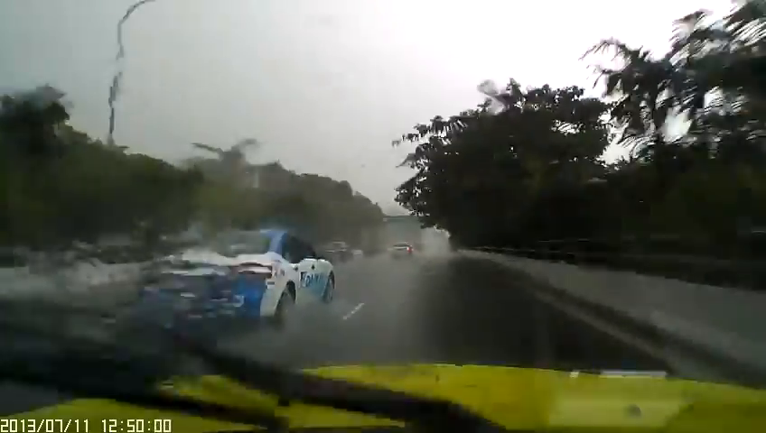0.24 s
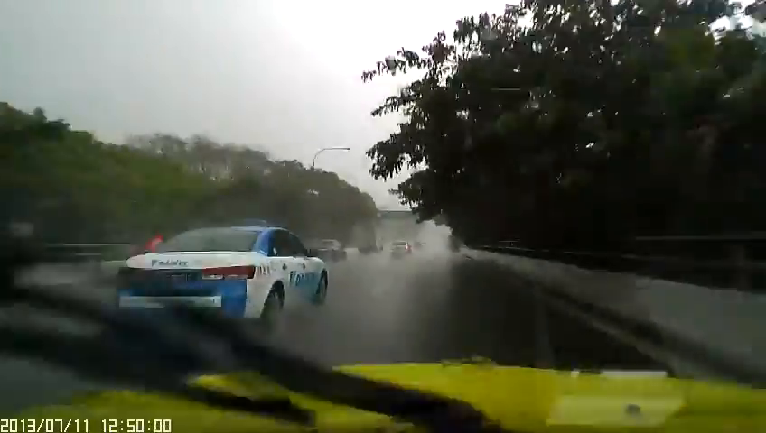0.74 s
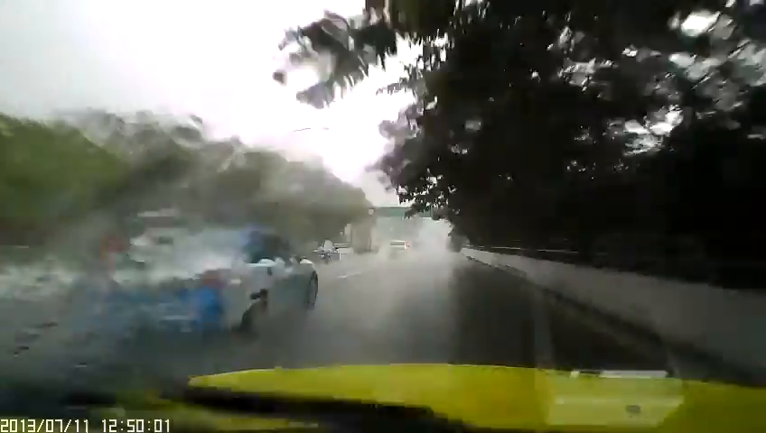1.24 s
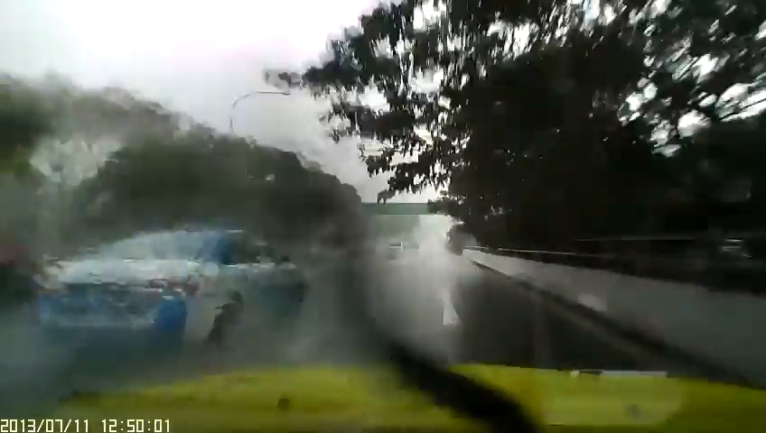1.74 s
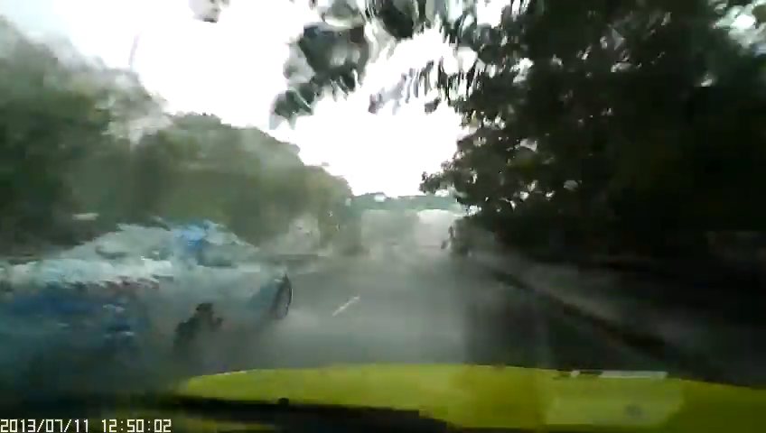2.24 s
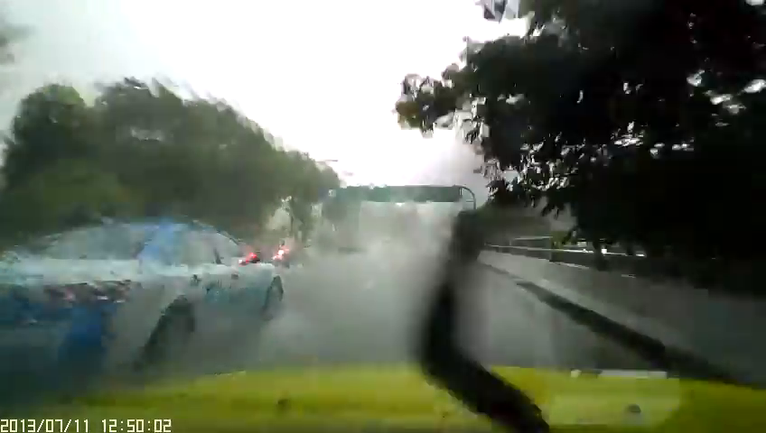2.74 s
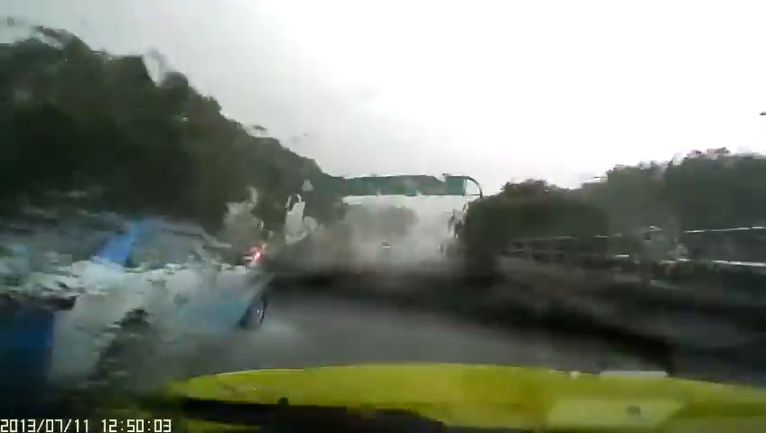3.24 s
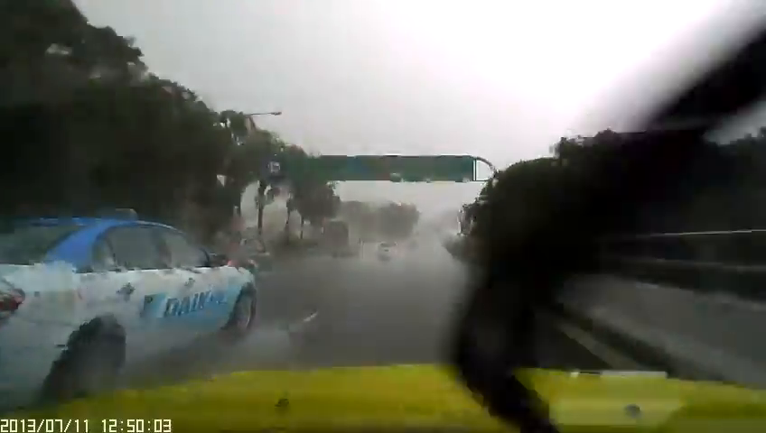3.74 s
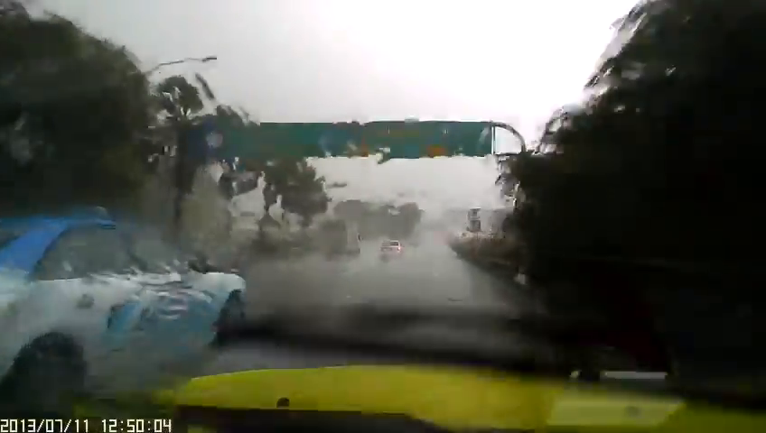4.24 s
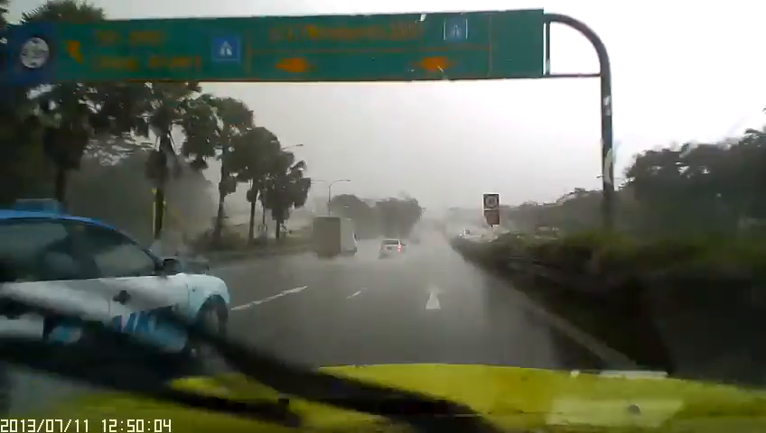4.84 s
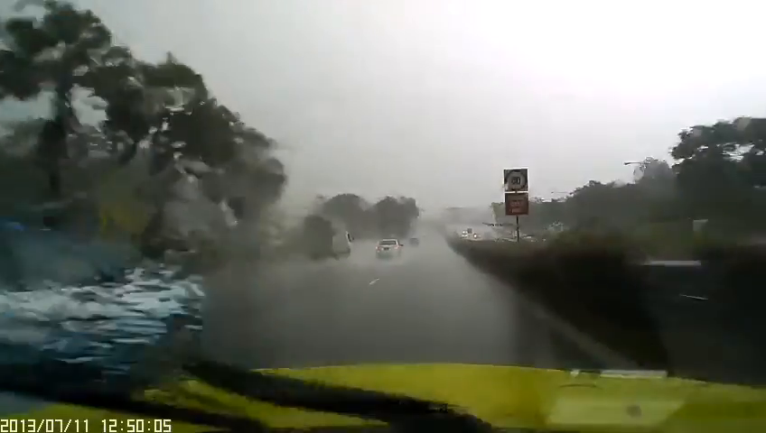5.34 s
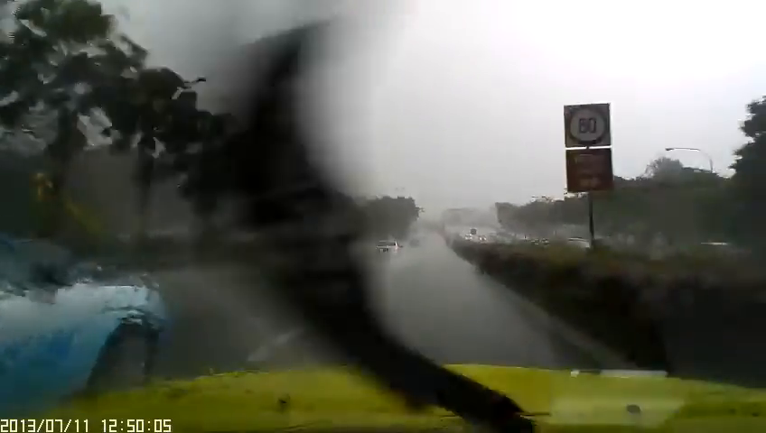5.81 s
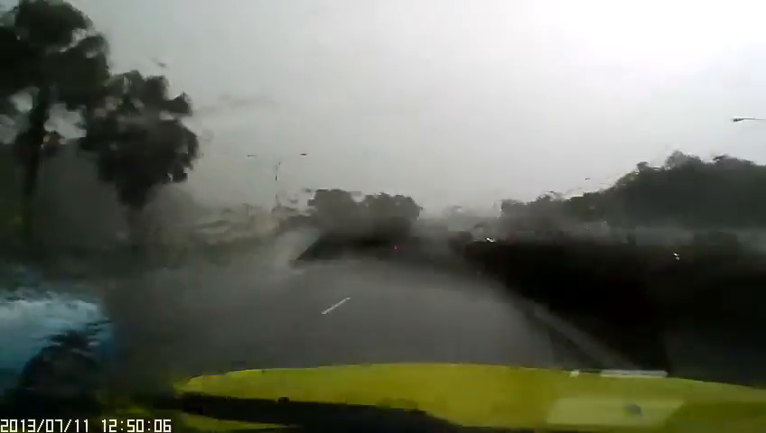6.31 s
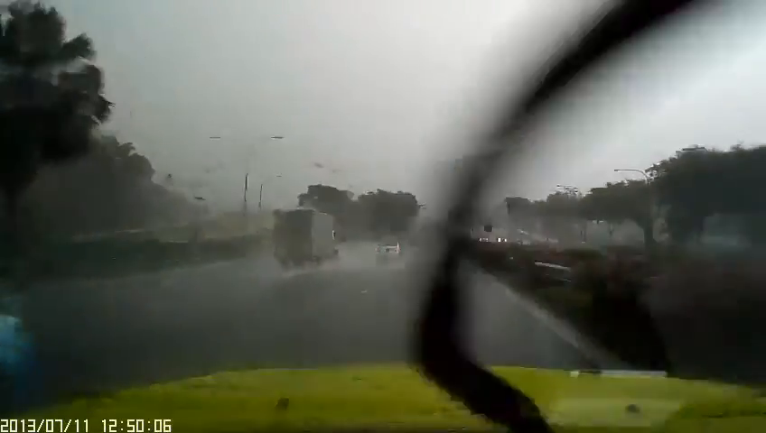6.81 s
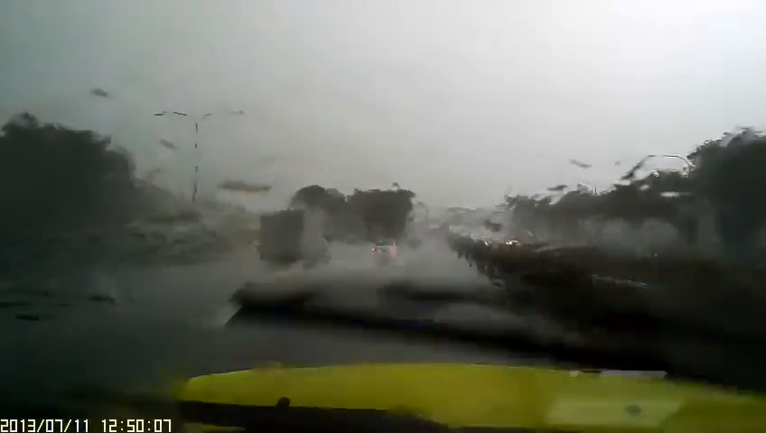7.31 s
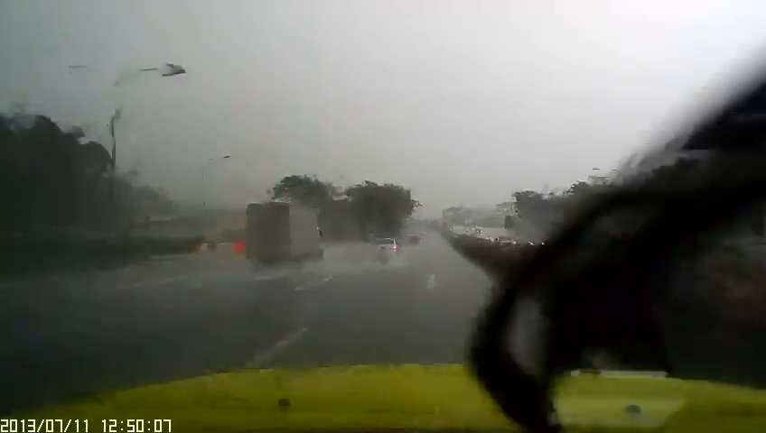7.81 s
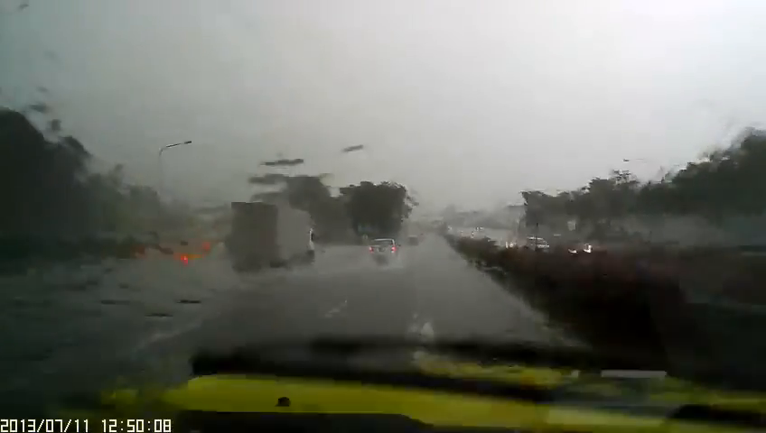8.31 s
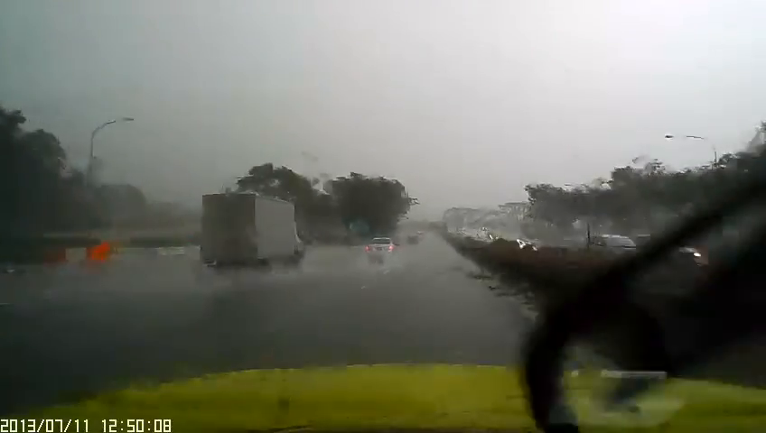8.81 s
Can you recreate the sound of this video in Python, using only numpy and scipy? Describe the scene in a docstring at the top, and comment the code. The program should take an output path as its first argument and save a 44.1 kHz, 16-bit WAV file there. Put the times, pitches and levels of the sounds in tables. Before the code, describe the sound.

Heavy rain drums on the windscreen and roof inside a moving car, with wipers thumping each second over deep road rumble and engine drone.

```python
"""Rain drums on the windscreen and roof of a car on a motorway: many small random blows, coloured by each panel.
Sheets of water make it swell, fat drops crack and splash, and an overhead sign gives a short lull.
The engine drones, eases off and picks up again as three sine overtones; the road rumbles as filtered noise with
some large deep swings. The wipers thump about once a second with ringing tones, a judder and a rub of noise.
Faint hiss follows the deep swings, and short noise ticks fall where a large swing crosses a level."""
import sys
import numpy as np
from scipy import signal
from scipy.fft import rfft, irfft, next_fast_len
from scipy.io import wavfile
from scipy.ndimage import uniform_filter1d

SR = 44100
rng = np.random.default_rng(int(sys.argv[2]) if len(sys.argv) > 2 else 0)


def file_out(sig):
    """Save sig as 16-bit WAV at sys.argv[1]."""
    # one column per channel
    cols = np.atleast_2d(sig).T
    # limit, then scale
    lim = np.clip(cols, -1, 1)
    pcm = np.round(lim * 32767).astype(np.int16)
    wavfile.write(sys.argv[1], SR, pcm)


N = 399546

# rain on glass and roof: level before the panel filter or at the roof [dB], change per dB of rain [dB]
GLASS_DB, GLASS_FOLLOWS = -29.5, 0.9
ROOF_DB, ROOF_FOLLOWS = -34, 1.19
# small chance swings of the rain, and of the roof alone [dB], and their speed [per s]
FLURRY_DB, ROOF_FLURRY_DB, FLURRIES_PER_S = 0.68, 1.1, 12
# shelter under an overhead sign: peak time [s], length [s], drop in rain [dB]
GANTRY_S, GANTRY_LENGTH_S, GANTRY_SHELTER_DB = 5.165, 0.2, 7.5
OCTAVE_DB, THIRD_DB = -14.5, -29   # engine overtones, before the cabin boom
SWING_HZ, SWING_LENGTH_S = 33, 0.099   # the large swings of the rumble
JUDDER_HZ, JUDDER_T60_S = 277, 0.027   # typical pitch, and time to grow or fade by 60 dB
RUB_RISE_S = 0.05   # time for the rub to grow by 60 dB
# a stretch of coarser asphalt: peak time [s], length [s]; pitch [Hz], filter width [Hz], level [dB]
COARSE_S, COARSE_LENGTH_S = 4.2, 4.0
COARSE_HZ, COARSE_WIDTH_HZ, COARSE_DB = 88, 70, -35
CUTOFF_HZ = 15600   # the treble above this is cut


def from_db(db):
    """Turn decibels into a plain factor for the sound wave."""
    return 10 ** (np.asarray(db) / 20)


def rms_one(x):
    """Scale to an average strength (rms) of 1."""
    return x / np.sqrt(np.mean(x ** 2) + 1e-20)


def in_time(rows):
    """Join the points of each column with straight lines, one value per sample."""
    s, *columns = np.transpose(rows)
    return [np.interp(np.arange(N) / SR, s, c) for c in columns]


def drift(rate):
    """Smooth chance wandering of rms 1 that changes about rate times a second."""
    hz = np.arange(N // 2 + 1) * SR / N
    slowed = rfft(rng.standard_normal(N)) / (1 + (hz / rate) ** 2)
    return rms_one(irfft(slowed, N))


def swell(s, length_s):
    """A smooth rise and fall between 0 and 1 that peaks at time s."""
    return np.cos(np.pi * np.clip((np.arange(N) / SR - s) / length_s, -.5, .5)) ** 2


def colour(x, spectrum):
    """Filter with the given spectrum that reacts only after a sound arrives, as early as it can (minimum phase)."""
    size = next_fast_len(N + SR // 2, real=True) // 2 * 2
    hz, db = np.transpose(spectrum)
    bins = np.maximum(np.arange(size // 2 + 1) * SR / size, 1)
    gain_db = np.interp(np.log(bins), np.log(hz), db)
    # folding the cepstrum forward in time gives the minimum-phase filter
    cepstrum = irfft(np.log(from_db(gain_db)))
    cepstrum[1:size // 2] *= 2
    cepstrum[size // 2 + 1:] = 0
    return irfft(rfft(x, size) * np.exp(rfft(cepstrum)))[:N]


def resonance(x, hz, width):
    """Let one pitch ring: a two-pole band-pass with gain close to 1 at its centre."""
    r = np.exp(-np.pi * width / SR)
    feed = np.array([1, 0, -1]) * (1 - r * r) / 2
    feedback = [1, -2 * r * np.cos(2 * np.pi * hz / SR), r * r]
    return signal.lfilter(feed, feedback, x + 1e-18)


def edge(x, hz, kind):
    """Keep only what lies below or above hz (second-order low- or high-pass)."""
    return signal.sosfilt(signal.butter(2, hz, kind, fs=SR, output="sos"), x)


def add(track, s, sound):
    """Mix a sound in at time s."""
    start = max(round(s * SR), 0)
    track[start:start + len(sound)] += sound[:N - start]


def impact(t60, cabin_db, cabin_t60):
    """One blow on a panel: noise that dies fast, then the short tail of the cabin; energy 1."""
    t = np.arange(SR // 10) / SR
    panel_fade = from_db(-60 * t / t60)
    cabin_fade = from_db(cabin_db - 60 * t / cabin_t60)
    ring = rng.standard_normal(len(t)) * (panel_fade + cabin_fade)
    return ring / np.linalg.norm(ring)


def patter(per_s, size_db, clump_db, t60, cabin_db, cabin_t60, count=16):
    """Drops of random size land in clumps on many spots of a panel, each spot with a ring of its own."""
    born = rng.random(N) < per_s / SR
    chance_size = np.minimum(rng.exponential(1, N), 4)
    sizes = from_db(size_db * chance_size + clump_db * drift(18.0))
    spot = rng.integers(0, count, N)
    drops = np.zeros(N)
    for k in range(count):
        drops += signal.oaconvolve(born * sizes * (spot == k), impact(t60, cabin_db, cabin_t60))[:N]
    # even out the strength over quarter seconds
    return drops / np.sqrt(uniform_filter1d(drops ** 2, size=SR // 4) + 1e-12)


def rain_strength():
    """The steady rain in dB, raised by each sheet of water and lowered under the overhead sign."""
    # how hard the steady rain beats on the car: (time [s], level [dB])
    steady_rain = [(0.0, -2), (0.8, 0.3), (1.15, 1.4), (2.15, 0.23), (2.55, -2.5), (3.95, -3.0), (4.2, 1.5),
                   (4.8, 1.1), (5.4, -6.5), (5.85, -5.5), (6.2, -0.8), (7.3, -3.5), (8.3, -1.0),
                   (9.06, 0.5)]
    # sheets of water that sweep over the car: (time of the peak [s], length [s], swell [dB])
    water_sheets = [(0.01, 0.54, 3), (0.363, 0.04, 2.5), (0.985, 0.38, 3), (1.417, 0.28, 3),
                    (1.612, 0.02, 7.5), (1.948, 0.45, 5.5), (2.323, 0.13, 4.5), (2.71, 0.13, 3.5),
                    (3.159, 0.15, 5.5), (3.616, 0.33, 5), (3.82, 0.29, 2), (4.105, 0.2, 4),
                    (4.352, 0.19, 2), (4.852, 0.12, 3), (5.078, 0.0871, 0.5), (5.28, 0.88, 2),
                    (5.51, 0.15, 5.5), (5.714, 0.42, 4.5), (6.01, 0.37, 4.5), (6.298, 0.092, 5),
                    (6.516, 0.39, 2.5), (6.888, 0.5, 5), (7.166, 0.12, 6), (7.46, 0.27, 3),
                    (7.968, 0.28, 3.5), (8.389, 0.33, 3), (8.571, 0.14, 4), (8.855, 0.24, 4.5)]
    steady_db, = in_time(steady_rain)
    sheets_db = sum(db * swell(s, length_s) for s, length_s, db in water_sheets)
    shelter_db = GANTRY_SHELTER_DB * swell(GANTRY_S, GANTRY_LENGTH_S)
    return steady_db + sheets_db - shelter_db + FLURRY_DB * drift(FLURRIES_PER_S)


def windscreen(level_db):
    """Heavier rain brings more drops; those nearest tick brightly; all of them ring in the same glass."""
    # colour of the glass before its resonances: (frequency [Hz], gain [dB])
    glass_colour = [(200, -11.5), (600, 5), (1000, 2.5), (1200, 0), (2050, -5), (2600, -0.5), (3300, -9),
                    (4300, -11.5), (5500, -19), (7700, -24), (8300, -28.5), (11000, -31), (15500, -38.5)]
    # windscreen resonances, each applied in turn: (frequency [Hz], width [Hz], boost [dB])
    glass_modes = [(950, 92, -0.5), (1604, 100, 4.5), (2470, 240, 6.5), (2800, 400, 3.3), (4100, 580, 1.5),
                   (6500, 250, 2), (7500, 200, -1.5)]
    per_s = 1500 * from_db(.7 * (level_db - level_db.mean()))
    rain = patter(per_s, size_db=4.0, clump_db=1.12, t60=0.014, cabin_db=-11.0, cabin_t60=0.098)
    near = patter(130, size_db=3.5, clump_db=4.5, t60=0.0084, cabin_db=-30.5, cabin_t60=0.037, count=8)
    ticks = from_db(-3.0) * edge(edge(near, 4500, "high"), 10000, "low")
    fat = fat_drops(splash_db=24.0, smack_db=1.0, crack_db=-1, damping=0.59)
    drops = from_db(level_db) * (rain + ticks) + from_db(26.0) * fat
    glass = colour(drops, glass_colour)
    for hz, width, boost_db in glass_modes:
        glass = glass + (from_db(boost_db) - 1) * resonance(glass, hz, width)
    return glass


def roof(level_db):
    """The lined steel roof turns the drops into a dull drumming."""
    # colour of the roof: (frequency [Hz], relative gain [dB])
    roof_colour = [(90, -17), (160, 4.5), (220, 3), (320, -1.5), (410, -3.5), (520, -4), (670, -2.5),
                   (780, -11), (950, -5), (1200, -20.5), (2500, -15.5), (6000, -57)]
    drumming = patter(700, size_db=1.5, clump_db=1.5, t60=0.037, cabin_db=-8.5, cabin_t60=0.11)
    return from_db(level_db) * rms_one(colour(drumming, roof_colour))


def engine(unsteady, waver_db):
    """The firing rate and its overtones swell as they pass through the booms of the cabin."""
    # engine speed and load: (time [s], mean firing rate [Hz], load [dB])
    engine_run = [(0, 58.1, 0), (.8, 58.6, -0.5), (1.14, 59.9, -0.5), (1.95, 59.34, -1.5), (2.32, 54, -1),
                  (2.5, 50.5, -0.5), (2.7, 41.7, -1.5), (3.1, 34.4, 0), (3.85, 29.61, 0), (6.7, 29, 1),
                  (7.0, 33, 1), (7.32, 37.87, 1.5), (7.44, 49.65, 0), (8.13, 51, -0.5), (8.4, 52.2, 0.5),
                  (8.68, 55.6, 1), (9.06, 54.1, 2)]
    # how the cabin booms at each pitch of the engine: (frequency [Hz], gain [dB])
    cabin_boom = [(29, -21.5), (41, -21), (50, -18.5), (59, -23.5), (80, -29), (100, -28.5), (112, -19.5)]
    hz, load_db = in_time(engine_run)
    boom_hz, boom_db = np.transpose(cabin_boom)
    phase = 2 * np.pi * np.cumsum(hz * (1 + unsteady * drift(6.7))) / SR
    out = np.zeros(N)
    for k, order_db in enumerate((0, OCTAVE_DB, THIRD_DB), 1):
        cabin_db = np.interp(np.log(k * hz), np.log(boom_hz), boom_db)
        level_db = load_db + order_db + cabin_db + waver_db * drift(8.9)
        out += from_db(level_db) * np.sin(k * phase + rng.uniform(0, 2 * np.pi))
    return np.sqrt(2) * out   # a sine of rms 1


def road(rumble_db, tyre_db):
    """The road shakes the body steadily; the air in the tyres hums on one wavering note."""
    # colour of the road noise: (frequency [Hz], relative gain [dB])
    road_colour = [(10, -13.5), (20, -5), (29, 2.5), (40, -4), (52, -4), (64, -15), (77, -11), (94, -17.5),
                   (135, -17.5), (160, -27.5), (220, -25), (400, -34.5), (1000, -41), (3000, -65.5),
                   (15500, -86.5)]
    # change in the deep road rumble: (time [s], level [dB])
    rumble_curve = [(0, 0), (2.3, -0.5), (3.0, -1), (5.3, -1), (7.0, -2.5), (7.5, -3.5), (8.3, -3.5),
                    (9.06, -2)]
    shake = rms_one(colour(rng.standard_normal(N), road_colour))
    deep = signal.sosfiltfilt(signal.butter(2, 80, fs=SR, output="sos"), shake)
    deep_strength = np.sqrt(uniform_filter1d(deep ** 2, size=SR // 8) + 1e-9)
    hum_phase = 2 * np.pi * np.cumsum(185.5 + 1.88 * drift(3.96)) / SR
    hum = rms_one(np.sin(hum_phase) * from_db(2.0 * drift(8.4)))
    surface_db, = in_time(rumble_curve)
    rumble = from_db(rumble_db + surface_db) * deep / deep_strength   # evened out
    return rumble + from_db(-23.0) * (shake - deep) + from_db(tyre_db) * hum


def fat_drops(splash_db, smack_db, crack_db, damping):
    """Big drops crack on the glass, each spot with its own pitch; some knock deeper, some splash brighter."""
    # fat drops, levels relative: (time [s], overall level [dB], pitch of the smack [Hz],
    # low knock [dB], bright splash [dB])
    big_drops = [(0.1804, -17.5, 1400, -19, -23), (0.499, -18, 1600, 1, -24), (0.716, -24, 1500, -6, -28),
                 (1.005, -15, 2400, -8, -23), (1.152, -19.5, 2600, -5, -25), (1.4483, -16, 1801, -2, -20.5),
                 (1.468, -23, 1600, -8, -28), (1.487, -20, 1400, 6.5, -27), (1.5347, -16.5, 2400, -6, -25),
                 (1.590, -24, 1600, -4, -36), (1.6158, -16.5, 1600, -12, -23),
                 (1.6659, -11.5, 1900, 5, -23.5), (1.8714, -18, 2390, -7, -20),
                 (1.9432, -15, 1500, -8, -17.5), (2.0215, -13, 1406, -18, -22.5),
                 (2.116, -16, 2500, -8, -22), (2.1587, -14.5, 1503, -12, -21),
                 (2.2502, -13.5, 1800, 2.5, -23.5), (2.319, -21, 2388, -6, -19),
                 (2.337, -19.5, 2000, -1, -25), (2.4490, -12.5, 2300, -24, -20.5),
                 (2.6724, -27, 1610, -3, -25), (2.709, -17, 1800, -6, -26), (3.1345, -22, 2300, -3, -17),
                 (3.2013, -22, 1600, -13, -11.5), (3.287, -22, 1498, -14, -19),
                 (3.327, -23.5, 1600, -5, -16.5), (3.404, -25, 2500, 3, -26), (3.588, -19, 2600, -8, -27),
                 (3.6785, -22.5, 2398, -14, -21), (3.774, -26, 2599, -12, -26),
                 (4.128, -19, 2600, -14, -32), (4.170, -19, 2505, -3, -34), (4.36, -17, 1610, -2, -25),
                 (4.6569, -19.5, 2600, -9, -28), (4.683, -21, 2003, 3, -21), (4.710, -25, 1498, -2, -27),
                 (4.8459, -17.5, 1600, -10, -22), (5.4919, -15, 2100, 5, -28), (5.889, -26, 1600, -7, -16),
                 (6.005, -20, 1514, -10, -28), (6.022, -23, 1600, 3, -23), (6.1799, -17.5, 2100, -5, -23),
                 (6.258, -19.5, 2200, -9, -27), (6.440, -22, 2600, -5, -28), (6.608, -22, 1897, -9, -18.5),
                 (7.022, -22.5, 2600, -12, -24), (7.4221, -12.5, 2101, -21, -22),
                 (8.024, -20.5, 1500, -14, -19.5), (8.140, -27.5, 1800, 3, -27),
                 (8.396, -18, 1707, -1, -24), (8.4106, -19, 1600, -6, -19), (8.443, -18, 1800, 2, -23)]
    out = np.zeros(N)
    for s, peak_db, hz, low_db, high_db in big_drops:
        hit = impact(t60=0.024, cabin_db=-20, cabin_t60=0.12)
        hit[SR // 1000] += from_db(crack_db)   # a sharp crack after 1 ms
        hit /= np.linalg.norm(hit)
        smack = from_db(smack_db) * resonance(hit, hz, 2000)
        knock = from_db(low_db) * edge(hit, 880, "low")
        splash = from_db(high_db + splash_db) * edge(hit, 4200, "high")
        add(out, s, from_db(peak_db) * (smack + knock + splash))
    # the spreading water damps the ring of the glass
    out = out - damping * resonance(out, 2230, 700)
    # a soft drop cannot strike faster than this
    return signal.sosfilt(signal.butter(8, 7300, fs=SR, output="sos"), out)


def rumble_with_swings(rumble):
    """At set times a few large, slow swings take over from the deep part of the rumble."""
    # the largest deep swings of the rumble: (time [s], swing [dB])
    rumble_swings = [(0.227, -12), (0.37, -11), (0.794, -12), (1.201, -11.5), (1.693, -11), (2.493, -12),
                     (2.736, -11), (2.865, -11), (3.214, -10.5), (3.359, -14), (3.701, -10), (3.803, -12),
                     (3.914, -11.5), (4.141, -9), (4.874, -9), (5.089, -7), (5.286, -10), (5.389, -11.5),
                     (5.785, -11.5), (6.089, -12), (6.516, -13.5), (7.048, -10), (7.953, -14.5),
                     (8.92, -14)]
    deep = signal.sosfiltfilt(signal.butter(2, 75, fs=SR, output="sos"), rumble)
    t = np.arange(-SR // 8, SR // 8) / SR
    shape = np.cos(np.pi * np.clip(t / SWING_LENGTH_S, -.5, .5)) ** 2
    swing = shape * np.cos(2 * np.pi * SWING_HZ * t)
    share, large_swings = np.zeros(N), np.zeros(N)
    for s, swing_db in rumble_swings:
        add(share, s + t[0], shape)
        add(large_swings, s + t[0], from_db(swing_db) * swing)
    return rumble - np.minimum(share, 1) * deep + large_swings


def wipers(knock_db, tail_db, rub_db, uneven_db):
    """At each turn the rubber drags and judders, flops over with a soft thud, rebounds and rubs on unevenly."""
    # each turn of the wipers, levels relative: (time [s], knock [dB], judder [dB], rub [dB],
    # time for the rub to fade by 60 dB [s], rebound delay [s], rebound against the knock [dB])
    wiper_turns = [(0.5436, -16, -14, -23.5, 0.2, 0.011, -9), (1.5629, -19.5, -18, -25.5, 0.27, 0.0385, -9),
                   (2.584, -22, -33, -34, 0.09, 0.028, -17), (3.604, -17, -17, -25, 0.21, 0.045, -9),
                   (4.6214, -18.5, -21, -28.5, 0.28, 0.0112, -9), (5.6380, -19, -21, -35, 0.15, 0.02, -10),
                   (6.6617, -23.5, -22, -38, 0.2, 0.031, -7), (7.682, -20, -20, -31, 0.13, 0.0103, -10),
                   (8.7062, -20, -24, -34, 0.15, 0.018, -12)]
    # ringing of the wiper linkage and the scuttle below the glass:
    # (frequency [Hz], typical relative level [dB], time to fade by 60 dB [s])
    wiper_modes = [(127, -12, 0.09), (234.5, -2, 0.081), (321, -5.5, 0.081), (440, -8, 0.026),
                   (624, -2.5, 0.03), (870, -4.5, 0.021), (1300, -7, 0.011)]
    out = np.zeros(N)
    t = np.arange(SR // 5) / SR
    around = np.arange(-SR // 20, SR // 5) / SR   # time before and after the turn
    for s, peak_db, shake_db, drag_db, rub_t60, rebound_s, rebound_db in wiper_turns:
        body = np.zeros(len(t))
        for hz, db, t60 in wiper_modes:
            body += from_db(db + rng.normal(0, 1.0) - 60 * t / t60) * np.cos(2 * np.pi * hz * t)
        # the rubber shakes as it bends over
        judder_hz = JUDDER_HZ * rng.uniform(0.904, 1.14)
        judder = from_db(-60 * np.abs(around) / JUDDER_T60_S) * np.cos(2 * np.pi * judder_hz * around)
        noise = rng.standard_normal(len(around))
        unevenness = rms_one(edge(rng.standard_normal(len(around)), 60, "low"))
        slips = noise * from_db(uneven_db * unevenness)
        rub = rms_one(resonance(slips, 334, 130) + from_db(-9.5) * resonance(slips, 570, 260))
        rub *= from_db(-60 * np.maximum(-around / RUB_RISE_S, around / rub_t60))
        # the dashboard rings on
        tail = edge(impact(t60=0.11, cabin_db=-8, cabin_t60=0.16), 230, "high")
        add(out, s, from_db(peak_db + knock_db) * body)
        add(out, s, from_db(peak_db + tail_db) * tail)
        add(out, s + rebound_s, from_db(peak_db + knock_db + rebound_db) * edge(body, 540, "low"))
        add(out, s + around[0], from_db(shake_db) * judder + from_db(drag_db + rub_db) * rub)
    # rubber blades leave little treble
    return signal.sosfilt(signal.butter(4, 1100, fs=SR, output="sos"), out)


def coarse_asphalt():
    """For a few seconds the tyres roll on a rougher surface and the floor drones: noise through two resonances."""
    drone = resonance(rng.standard_normal(N), COARSE_HZ, COARSE_WIDTH_HZ)
    drone = resonance(drone, COARSE_HZ, COARSE_WIDTH_HZ)
    return from_db(COARSE_DB) * swell(COARSE_S, COARSE_LENGTH_S) * rms_one(drone)


def scene():
    """One strength of rain drives glass and roof, over the engine, the road and the wipers."""
    rain_db = rain_strength()
    glass = windscreen(GLASS_DB + GLASS_FOLLOWS * rain_db)
    roof_flurry_db = ROOF_FLURRY_DB * drift(FLURRIES_PER_S)
    drumming = roof(ROOF_DB + ROOF_FOLLOWS * rain_db + roof_flurry_db)
    motor = engine(unsteady=0.004, waver_db=1.5)
    rumble = rumble_with_swings(road(rumble_db=-20.0, tyre_db=-43))
    car = motor + rumble + coarse_asphalt()
    thumps = wipers(knock_db=-0.5, tail_db=30, rub_db=-0.5, uneven_db=5.0)
    return (glass + drumming + car + thumps)[None]   # one channel


def record(dry, limit=0.29, crackle_db=-31.5, hiss_db=-52):
    """Faint hiss follows the deep swings; short noise ticks fall where a large swing crosses a level; the top is cut."""
    swing = np.abs(edge(dry[0], 230, "low"))
    crossings = np.diff(swing > limit, prepend=False)
    ticks = signal.lfilter([1], [1, -.8], crossings + 1e-18)   # each tick fades within a few samples
    grit = from_db(hiss_db) * swing + from_db(crackle_db) * ticks
    top_cut = signal.ellip(10, .1, 90, CUTOFF_HZ, fs=SR, output="sos")
    return signal.sosfilt(top_cut, dry + grit * rng.standard_normal(N))


dry = scene()
out = record(dry)
file_out(out)
```